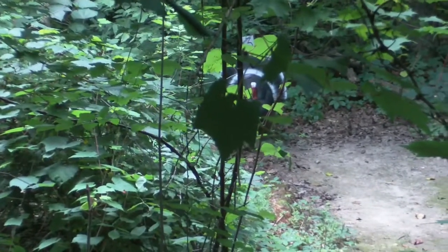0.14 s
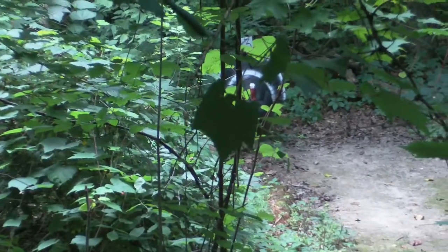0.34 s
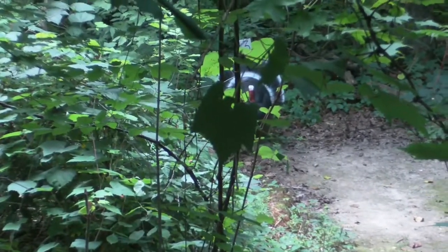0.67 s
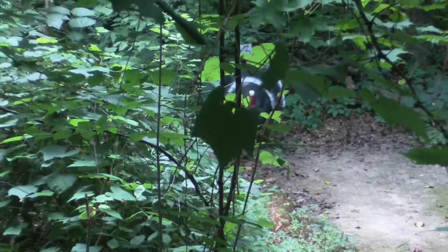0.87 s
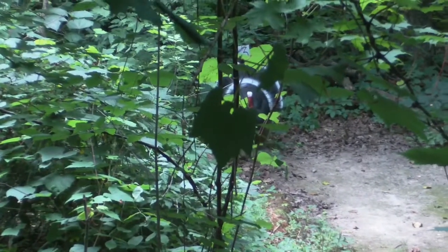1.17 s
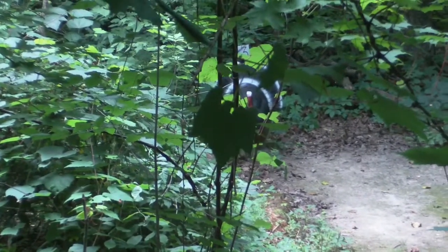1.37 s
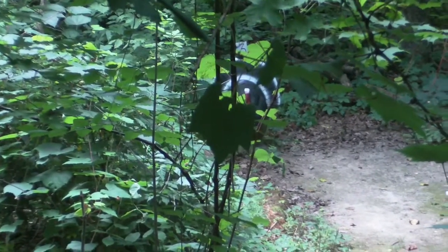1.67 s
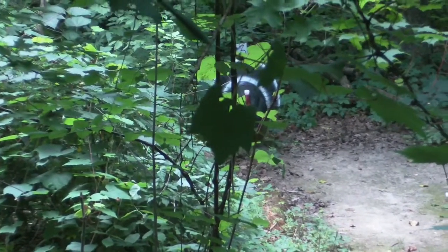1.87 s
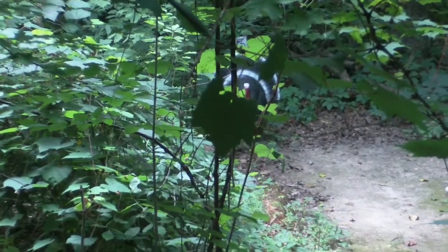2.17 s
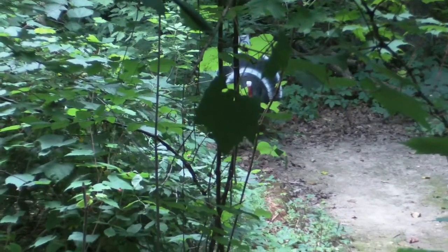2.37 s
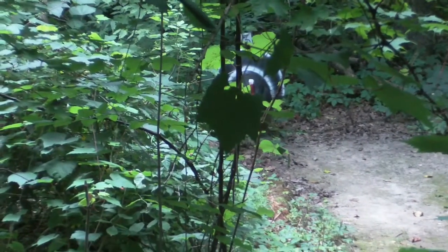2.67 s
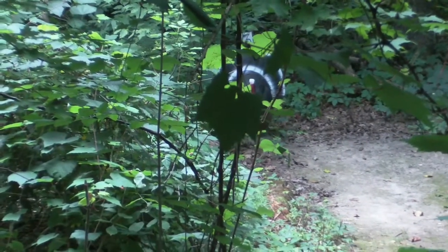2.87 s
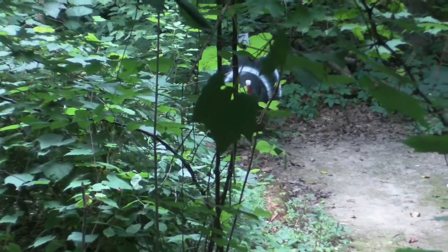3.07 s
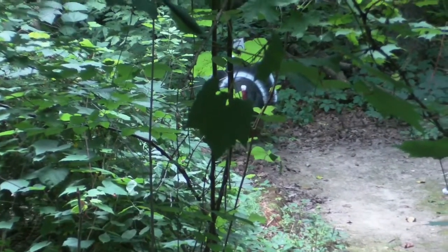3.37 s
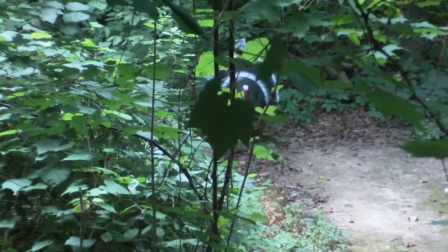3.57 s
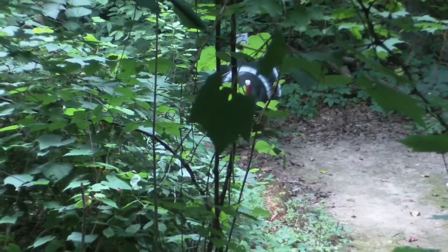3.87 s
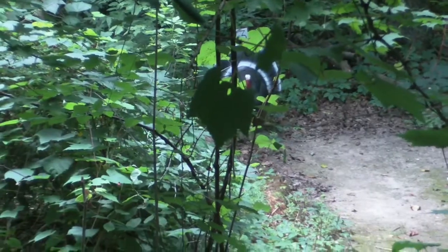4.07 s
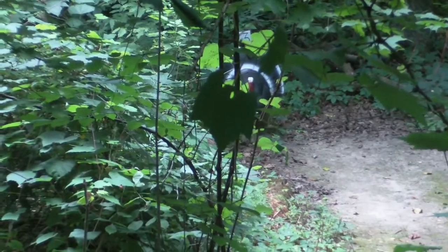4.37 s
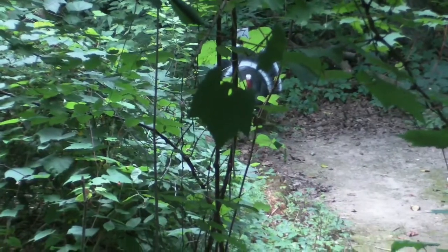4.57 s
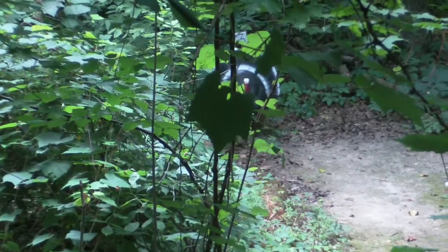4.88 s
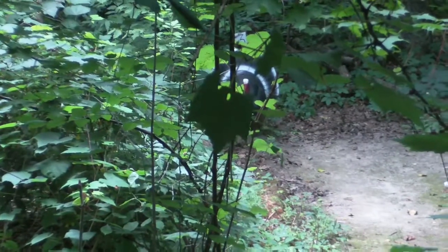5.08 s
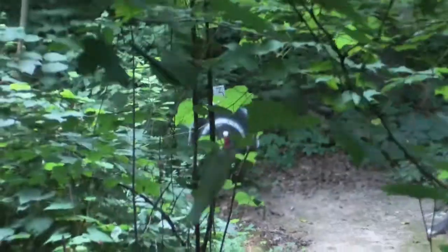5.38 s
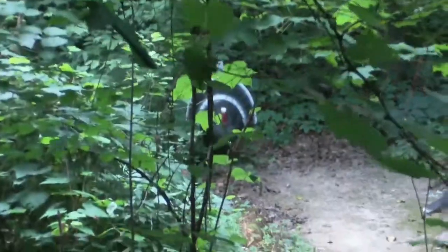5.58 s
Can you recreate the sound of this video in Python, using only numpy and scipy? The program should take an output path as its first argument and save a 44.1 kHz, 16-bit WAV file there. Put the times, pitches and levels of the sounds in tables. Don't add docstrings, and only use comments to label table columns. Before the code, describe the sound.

Five seconds of soft outdoor wash and tiny ticks, then a violent string slap, brief chatter, and a dull target thud echoing among trees.

```python
import sys
import numpy as np
from scipy import signal
from scipy.fft import rfft, irfft
from scipy.io import wavfile
from scipy.ndimage import uniform_filter1d

SR = 44100
rng = np.random.default_rng(int(sys.argv[2]) if len(sys.argv) > 2 else 0)


def how_loud(loudness_db):
    steps = np.asarray(loudness_db, float) / 20
    return 10 ** steps


def inscribe(sig):
    pcm = np.round(np.clip(np.atleast_2d(sig).T, -1, 1) * 32767)
    wavfile.write(sys.argv[1], SR, pcm.astype(np.int16))


N = 253134
TIME = np.arange(N) / SR


def level(x, db):
    return x * how_loud(db) / np.sqrt(np.mean(x ** 2))


def coloured(spectrum):
    hz, db = np.transpose(spectrum)
    bins = np.maximum(np.fft.rfftfreq(N, 1 / SR), 1)
    gain = how_loud(np.interp(np.log(bins), np.log(hz), db))
    return level(irfft(rfft(rng.standard_normal(N)) * gain, N), 0)


def band(hz, width):
    bell = np.exp(-((np.fft.rfftfreq(N, 1 / SR) - hz) / width) ** 2)
    return level(irfft(rfft(rng.standard_normal(N)) * bell, N), 0)


def ring(modes, tilt_db=0., above_hz=4000.):
    t = TIME[:SR]
    fall = np.log(1000)
    out = np.zeros(SR)
    for hz, db, t60 in modes:
        size = how_loud(db + tilt_db * (hz > above_hz))
        out += size * np.sin(2 * np.pi * hz * t) * np.exp(-fall * t / t60)
    return out


def add(out, s, x):
    i = int(s * SR)
    out[i:i + len(x)] += x[:N - i]


def push(length):
    return np.hanning(max(int(length * SR), 4))


def scrape(length):
    t = TIME[:400] / length
    grit = rng.standard_normal(400) * t * np.exp(-t)
    grit = np.convolve(grit, np.hanning(12))
    return grit / np.sqrt(np.sum(grit ** 2))


def passing(vehicles):
    power = 0
    for s, db, lag in vehicles:
        power = power + (how_loud(db) / (1 + ((TIME - s) / lag) ** 2)) ** 2
    return np.sqrt(power)


# f/Hz, level/dB per Hz
WOOD_WASH = [(12, -32.5), (20, -3.5), (60, 3), (93, -7.5), (120, -8), (158, -9.5), (198, -7.5),
             (228, -10.5), (262, -9.5), (410, -18.5), (738, -15), (1710, -23.5), (2200, -33), (6720, -48.5),
             (16000, -65)]
# f/Hz, width/Hz, level/dB
ENGINE_HUM = [(128.2, 7.3, -5), (187, 11, -15), (256.1, 2.7, -11.5)]
# closest t/s, level/dB there, (distance / speed)/s
CARS_PASSING = [
    (0.05, -47.5, 0.2),
    (2.3, -52, 0.37),
    (4.1, -41.5, 0.6),
    (4.9, -42, 0.25),
    (5.8, -37.5, 0.27),
]
# closest t/s, level/dB there, (distance / speed)/s
LORRIES_PASSING = [
    (1.2, -39, 0.8),
    (3.5, -44.5, 0.28),
]


def background():
    hum = sum(how_loud(db) * band(hz, width) for hz, width, db in ENGINE_HUM)
    wash = level(coloured(WOOD_WASH), -37.5)
    tyres = passing(CARS_PASSING) * band(805.0, 450.0)
    return wash + tyres + passing(LORRIES_PASSING) * hum


# t/s, length/s, top f/Hz, level/dB, smear
WHISTLES = [
    (3.05, 0.49, 3090, -63.5, .6),
    (3.13, 0.2, 3440, -69, .5),
    (3.56, 0.12, 4250, -80, 1.5),
]
# t/s, length/s, f/Hz, width/Hz, level/dB
HIGH_TRILLS = [
    (.24, .06, 7000, 900, -70.5),
    (1.666, 0.14, 7180, 900, -72),
    (3.15, 0.16, 7200, 900, -73),
    (3.304, 0.71, 4500, 1510, -66.5),
    (3.485, 0.11, 3980, 220, -62),
    (4.852, 0.17, 7270, 900, -71),
]


def wildlife():
    out = np.zeros(N)
    scoop, scoop_s, sag_per_s2, overtone_db = .08, .035, .47, -12
    for s, length, hz, db, smear in WHISTLES:
        t = np.clip(TIME - s, 0, length)
        pitch = hz * (1 - scoop * np.exp(-t / scoop_s) - sag_per_s2 * t ** 2)
        phase = 2 * np.pi * np.cumsum(pitch) / SR
        tone = np.sin(phase) + how_loud(overtone_db) * np.sin(2 * phase)
        sounding = np.sqrt(np.abs(np.sin(np.pi * t / length)))
        flutter = 1 + smear * band(0., 160.)
        out += np.sqrt(2) * how_loud(db) * sounding * flutter * tone
    for s, length, hz, width, db in HIGH_TRILLS:
        out += how_loud(db) * np.exp(-((TIME - s) / length * 2) ** 2) * band(hz, width)
    return out


# f/Hz, level/dB per Hz
TREE_COLOUR = [(120, -29.5), (200, -4.5), (416, -9.5), (777, -7.5), (1040, -15), (1350, -11), (2470, -19),
               (6280, -31), (16000, -57.5)]
# t/s, swell/s, t60/s, level/dB, brightness/dB
TREE_RETURNS = [
    (5.232, 0.015, .06, -34, 6),
    (5.24, 0.29, 0.4, -40.5, -0.5),
    (5.494, .03, 0.63, -27, -16.5),
]


def trees():
    broad, bright = 0, 0
    for s, swell, t60, db, bright_db in TREE_RETURNS:
        t = TIME - s
        decay_db = 60 * np.maximum(t - swell, 0) / t60
        power = np.clip(t / swell, 0, 1) * how_loud(db - decay_db) ** 2
        broad = broad + power
        bright = bright + power * how_loud(2 * bright_db)
    grain = how_loud(1.1 * band(0., 150.))
    leaves = how_loud(-2) * np.sqrt(bright) * band(6300., 1100.)
    trunks = np.sqrt(broad) * coloured(TREE_COLOUR)
    twigs = how_loud(-2) * np.sqrt(bright) * band(4300.0, 2200.)
    return grain * (trunks + twigs) + leaves


def chatter(count):
    start_s, gap_s = 5.248, .0034
    start_db, fade_db_per_s, scatter_db = -17.5, -58.5, 4
    chance = rng.standard_normal((count, 2))
    t = gap_s * (np.arange(count) + 0.081 * chance[:, 0])
    db = start_db + fade_db_per_s * t + scatter_db * chance[:, 1]
    return list(zip(start_s + t, db))


# t/s, peak level/dB, brightness/dB
TRIGGER_TICKS = [(.283, -51, -5), (.309, -50, -5), (.494, -57, -6), (0.5067, -41, 7), (0.5094, -39.5, 7),
                 (.5125, -45, 7), (0.544, -55, -10), (5.203, -35, -4), (5.2042, -37, 0),
                 (5.2056, -38.5, -6), (5.2193, -43.5, -14), (5.225, -42.5, -4)]
# f/Hz, level/dB, t60/s
LATCH_MODES = [(2480, -9.5, .012), (3490, 0.5, .018), (3540, 2.5, .022), (3920, -7, .01),
               (4250, -4.5, 0.011), (4550, -1.5, 0.013), (4993, -7.5, .01), (5700, -13, .008)]
# f/Hz, level/dB, t60/s
SEAR_MODES = [(3500, -37.5, .055), (4500, -42, .015)]
# f/Hz, level/dB, t60/s
FITTING_MODES = [(2444, -17, .02), (3097, -13, .012), (3500, 1.5, 0.013), (3880, 3, .014),
                 (4250, -7.5, 0.01), (5201, -24, .008), (6300, -24.5, .01)]
# t/s, peak level/dB
FINAL_KNOCKS = [
    (5.2954, -22),
    (5.312, -26),
]


def fittings():
    out = np.zeros(N)
    for s, db, bright_db in TRIGGER_TICKS:
        tick = signal.fftconvolve(scrape(0.00031), ring(LATCH_MODES, bright_db)[:4000])
        add(out, s, how_loud(db - 6.0) * tick)
    add(out, 5.2035, ring(SEAR_MODES))
    for s, db in [*chatter(count=16), *FINAL_KNOCKS]:
        knock = signal.fftconvolve(scrape(0.00039), ring(FITTING_MODES)[:2000])
        add(out, s, how_loud(db - 8) * knock)
    return out


# t/s, level/dB
TIP_STRIKES = [
    (5.4932, 0),
    (5.4947, -5),
]
# f/Hz, level/dB, t60/s
FOAM_MODES = [(97.3, -13, .17), (202, -9.5, 0.078), (279, -4.5, 0.039), (467, -7, 0.021), (853, -4, 0.01)]


def target():
    out = np.zeros(N)
    tip = -signal.fftconvolve(push(0.00035), [1, *np.zeros(12), -.5, *np.zeros(14), .15])
    tip[4] -= .25
    for s, db in TIP_STRIKES:
        add(out, s, how_loud(db) * tip)
    add(out, 5.496, .25 * push(.0016))
    blow = push(.001)
    boom = signal.lfilter(*signal.butter(2, 85, "high", fs=SR), ring(FOAM_MODES))
    add(out, 5.4974, signal.fftconvolve(blow / blow.sum(), boom))
    return out


# t/s, level/dB, burst length/s, share of the deeper modes/dB
STRING_SLAPS = [
    (5.2315, 9.5, 0.0014, -17.5),
    (5.2338, 10, .0010, -30),
    (5.2394, 5.5, 0.00085, 3),
    (5.245, -4.5, 0.00233, -3),
]
# f/Hz, level/dB, t60/s
RAIL_MODES = [(1030, -11, 0.018), (1527, -5, 0.018), (2080, -3, .012), (2444, -1, 0.022),
              (2803, 0.5, 0.019), (2935, -2.5, 0.019), (3287, 3.5, 0.025), (3500, 1, 0.024),
              (3740, -4, 0.05), (4235, -4.5, 0.027), (5096, -10.5, 0.039), (6250, -13.5, 0.012)]
# t/s, signed size
RECOIL_JOLTS = [
    (5.2291, -0.07),
    (5.2314, 0.46),
    (5.2373, -1),
]
# f/Hz, level/dB, t60/s
STOCK_MODES = [(59, -10.5, .04), (111, -4, 0.041), (253, 1, .022), (387, -9.5, .014)]
LIMB_PITCHES = [92, 151, 190, 275, 355, 490, 641, 744, 2812, 3499]
# level/dB, t60/s
LIMB_DECAYS = [(-18.5, 1.1), (-6, 0.6), (-7.5, .09), (-23, 1.6), (-31.5, 0.74), (-29.5, 0.33), (-28.5, .15),
               (-32.5, 2), (-33, 0.8), (-41.5, 1.0)]


def crossbow():
    out = np.zeros(N)
    for s, db, length, deep_db in STRING_SLAPS:
        blow = .5 * scrape(length)
        blow[:4] += [.2, .5, .5, .2]
        rail = how_loud(deep_db) * ring(RAIL_MODES, -deep_db, 2600.)[:3000]
        add(out, s, how_loud(db - 11.5) * signal.fftconvolve(blow, rail))
        crack = band(3400, 2940)[:2000] * np.exp(-TIME[:2000] / 0.0027)
        add(out, s, how_loud(db - 11.5) * crack)
    for s, size in RECOIL_JOLTS:
        add(out, s, size * ring(STOCK_MODES)[:4000])
    ringing = ring([(hz, *mode) for hz, mode in zip(LIMB_PITCHES, LIMB_DECAYS)])
    settling = 1 - np.exp(-TIME[:len(ringing)] / .008)
    add(out, 5.24, ringing * settling)
    return out


def scene():
    mid = background() + wildlife() + fittings() + crossbow() + target() + trees()
    return np.array([mid, mid])


def ducking():
    depth_db, attack_s, hold_s, release_s = -22, .017, 0.13, 0.19
    t = np.maximum(TIME - 5.241, 0)
    drop = 1 - np.exp(-t / attack_s)
    recovery = np.exp(-np.maximum(t - hold_s, 0) / release_s)
    return how_loud(depth_db * drop * recovery)


def low_pass(x):
    return signal.sosfilt(signal.butter(12, 16490, fs=SR, output="sos"), x)


def record(dry):
    hot = dry * ducking()
    railed = .88 * hot / (1 + np.abs(hot) ** 3) ** (1 / 3)
    railed = signal.lfilter(*signal.butter(2, 11000, fs=SR), railed)
    grit = coloured([(200, -5), (1500, -3), (3000, 6.5), (8000, -0.5), (16000, -11.5)])
    grit *= how_loud(-91.0) + how_loud(-36) * uniform_filter1d(np.abs(railed[0]), size=128)
    hiss = how_loud(-79.5) * coloured([(500, -7), (4000, 1.0), (16000, -6)])
    both = railed + hiss + np.array([grit, -grit])
    top_cut = signal.ellip(8, .2, 70, 16100, fs=SR, output="sos")
    mix = signal.sosfilt(top_cut, both)
    return low_pass(mix)


dry = scene()
out = record(dry)
inscribe(out)
```